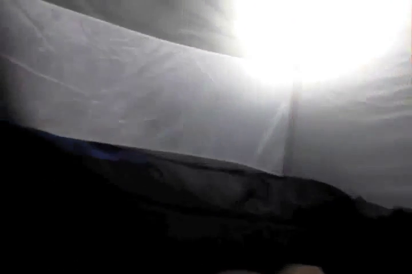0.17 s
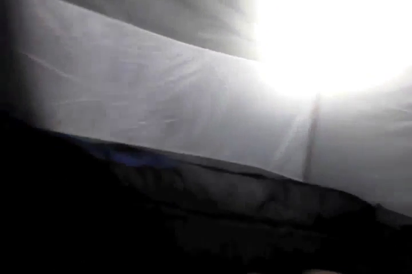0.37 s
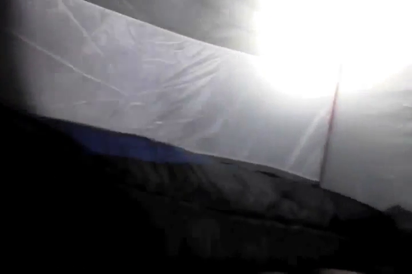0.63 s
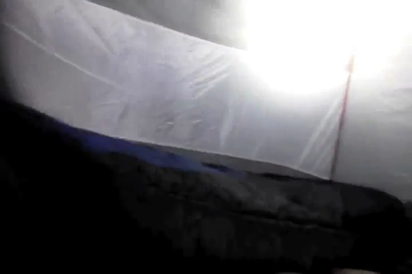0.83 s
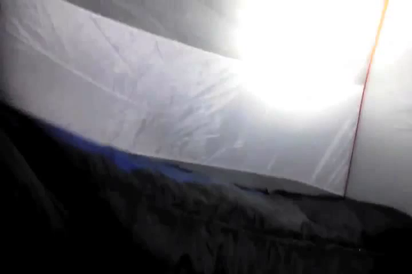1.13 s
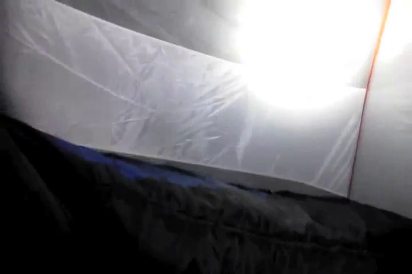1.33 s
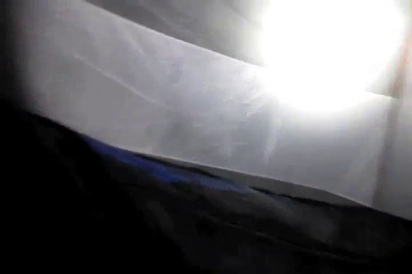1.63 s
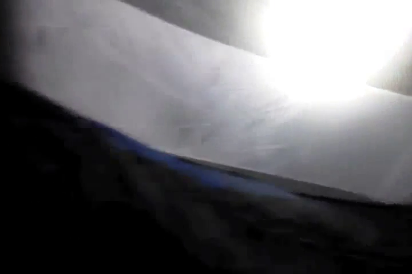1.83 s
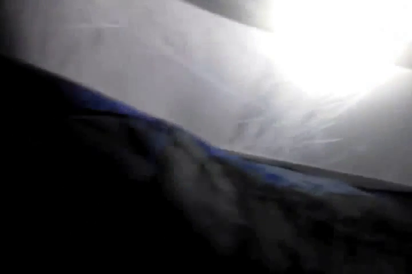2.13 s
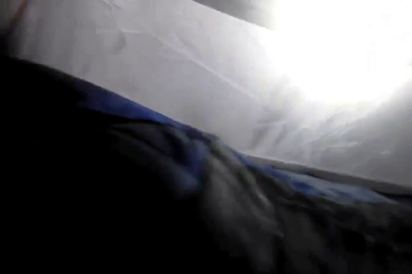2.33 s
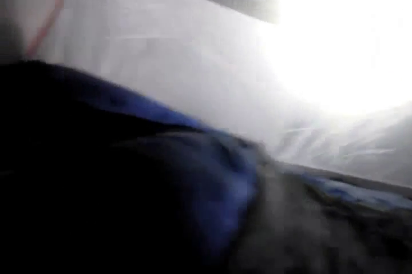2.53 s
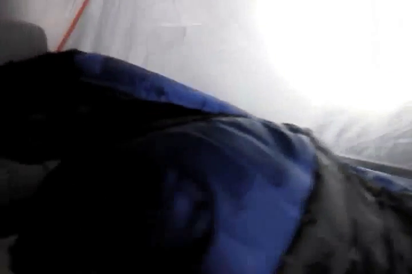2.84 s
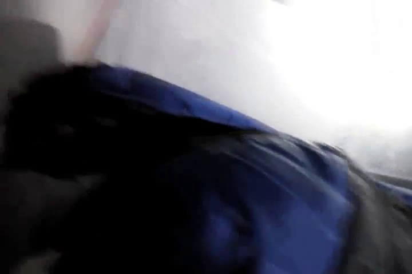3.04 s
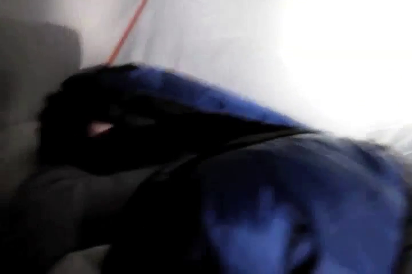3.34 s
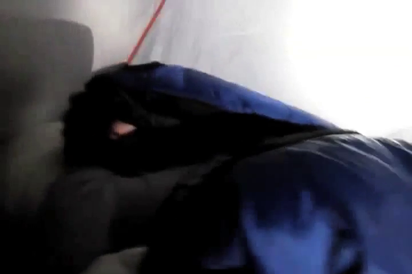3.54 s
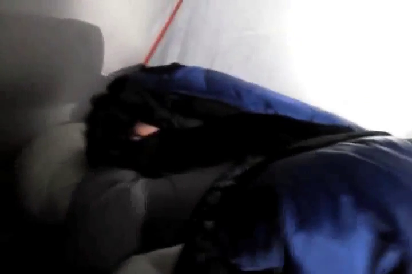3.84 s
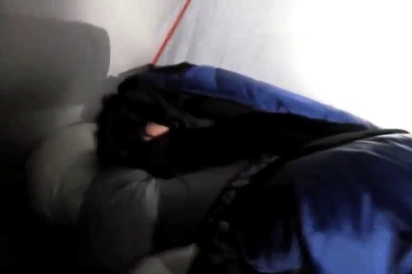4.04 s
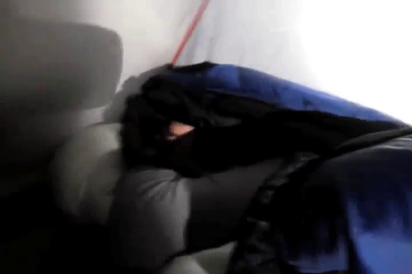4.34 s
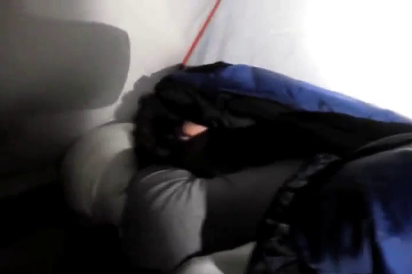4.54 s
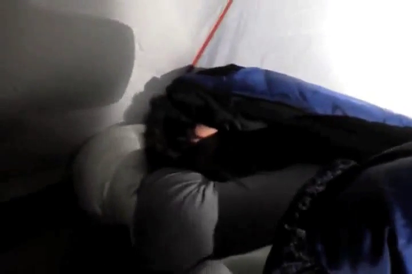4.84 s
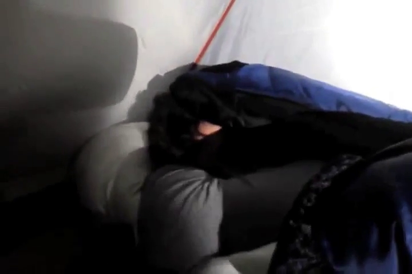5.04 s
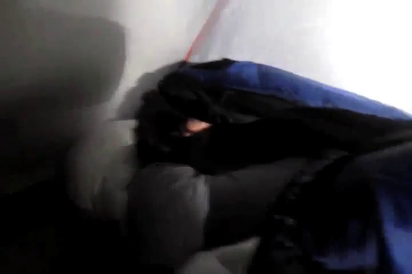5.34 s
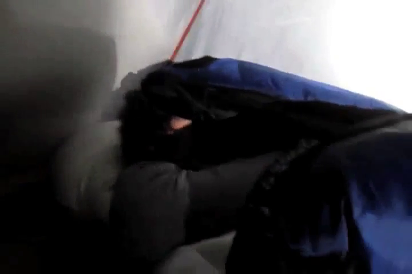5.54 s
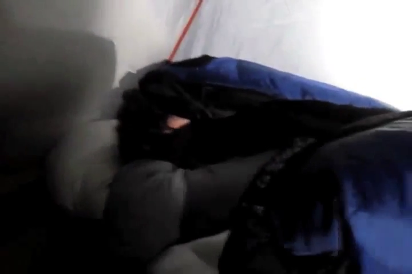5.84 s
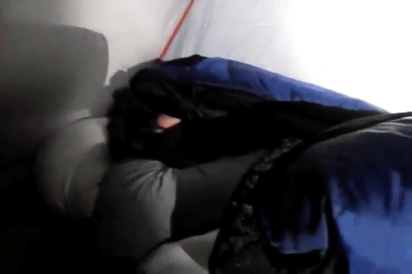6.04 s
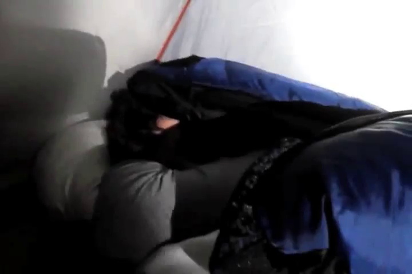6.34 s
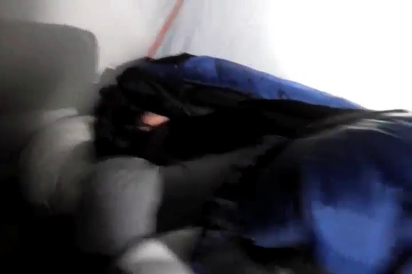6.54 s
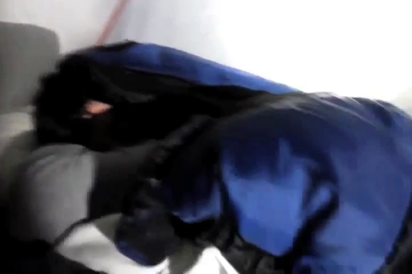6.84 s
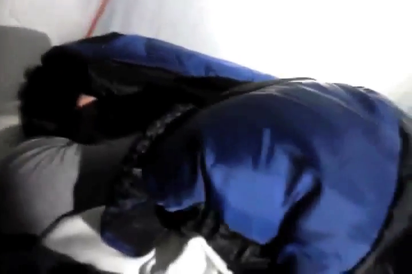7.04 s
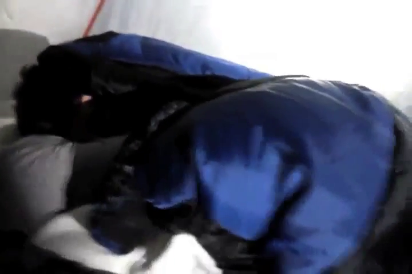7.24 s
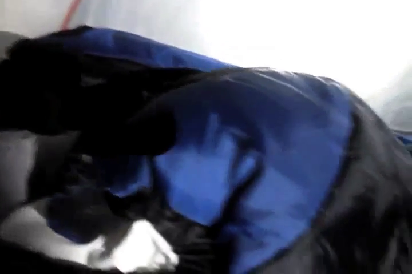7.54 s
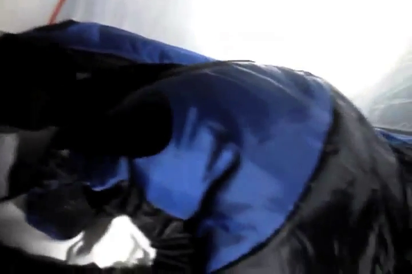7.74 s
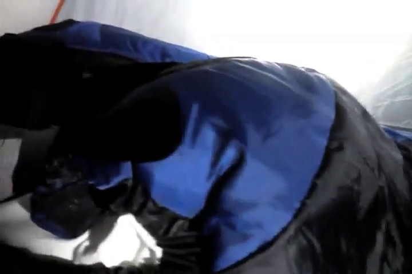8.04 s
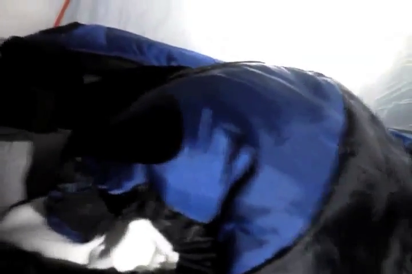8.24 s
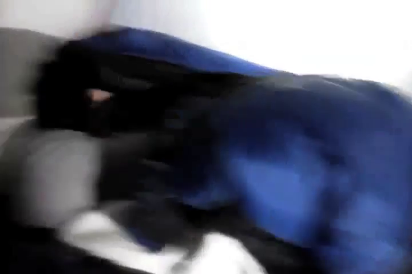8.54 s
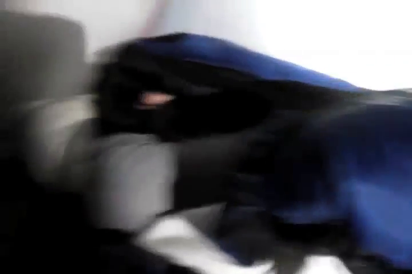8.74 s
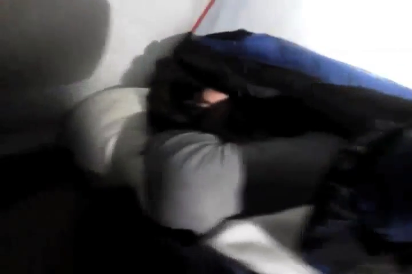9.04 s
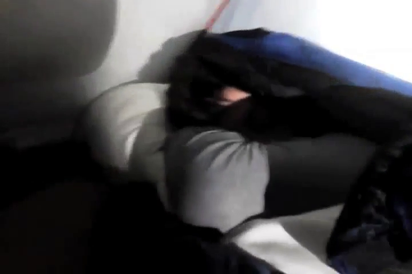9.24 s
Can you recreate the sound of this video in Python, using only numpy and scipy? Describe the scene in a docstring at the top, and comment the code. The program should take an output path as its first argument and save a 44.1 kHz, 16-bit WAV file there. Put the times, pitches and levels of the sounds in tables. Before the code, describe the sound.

Heard from inside a tent at night through a small camera with coarse, bright-edged sound. At 0 s the echoes of a call fade beneath light finger taps and a soft rub of nylon. From about 0.3 s a nightjar outside calls about every 0.9 s until the end near 9.4 s: a short scoop into a held whistle, a lower rough rising note, then a loud, rapid sweep up and down. All notes flutter and smear into woodland echoes. Close knocks gather at 0.35-0.75 s, the last a dull, strong thud. Sleeping-bag rustles come in short strokes until about 1.4 s, again near 2 s, and faintly to 3.3 s. Taps recur at 2.1 and 2.2 s, with faint ones at 5.5, 7.4 and 7.6 s. Low lumpy grip rumble peaks near 1 s and stirs slightly around 4 s. Steady soft hiss lies beneath.

```python
"""Soft taps and rustling nylon come first, over the dying echoes of a call; then a nightjar sings its three-note call
again and again among trees, heard from inside a tent. Each note is a fluttering tone with a gliding pitch, convolved
with decaying noise for the smear of echoes from the trunks. Fingertips ring the damped modes of a small camera's
case; the sleeping bag and the grip on the camera are shaped noise, over a steady hiss. The camera takes 8000 samples
a second and joins them by straight lines, which mirrors every sound into the treble."""
import sys
import numpy as np
from scipy import signal
from scipy.fft import rfft, irfft, next_fast_len
from scipy.io import wavfile
from scipy.ndimage import uniform_filter1d, map_coordinates

SR = 44100
rng = np.random.default_rng(int(sys.argv[2]) if len(sys.argv) > 2 else 0)


def waveform_to_disk(signal):
    """Save audio, clipped to [-1, 1], as 16-bit WAV at the path in sys.argv[1]."""
    frames = np.transpose(np.atleast_2d(signal))
    scaled = np.clip(frames, -1, 1) * 32767
    samples = np.round(scaled).astype(np.int16)
    wavfile.write(sys.argv[1], SR, samples)


N = 414099


def amp(db):
    """Amplitude ratio from level: 20 dB is a factor of ten."""
    return 10 ** (np.asarray(db) / 20)


def unit(x):
    """Normalise the mean power to one."""
    return x / np.sqrt(np.mean(x ** 2) + 1e-20)


def wobble(rate, size=N):
    """Slow random modulation: a smooth curve through normal random knots, rate of them a second."""
    knots = rng.standard_normal(size // 100 + 4)
    return map_coordinates(knots, [np.arange(size) * rate / SR])


def filtered(x, response):
    """Linear filtering: the spectrum of x times a response of frequency."""
    size = next_fast_len(N + 8192)
    hz = np.fft.rfftfreq(size, 1 / SR)
    return irfft(rfft(x, size) * response(hz), size)[:N]


def coloured(x, spectrum):
    """Spectral shaping through (frequency [Hz], level [dB]) points on a log axis, brought to rms 1."""
    f, db = np.transpose(spectrum)
    return unit(filtered(x, lambda hz: amp(np.interp(np.log(hz + 1), np.log(f), db, right=-120))))


def gain_curve(rows):
    """Amplitude envelope: gain per sample from (time [s], level [dB]) rows, -120 dB outside them."""
    s, db = np.transpose(rows)
    return amp(np.interp(np.arange(N) / SR, s, db, left=-120, right=-120))


def add(track, s, sound):
    """Superposition: mix sound in at s seconds; the track starts one second early."""
    part = track[round((s + 1) * SR):][:len(sound)]
    part += sound[:len(part)]


def wood_echoes():
    """Multiple scattering: decaying noise from the wood, with humps of energy from nearer stands of trunks."""
    wood_db, wood_t60_s = -44, 1.45  # the even wash from the rest of the wood
    # Nearer stands of trunks: (echo delay [s], spread [s], level [dB])
    stands = [(.01, .02, -41), (.08, .02, -42.5), (.2, .02, -52)]
    lag = np.arange(SR) / SR
    power = amp(wood_db - 60 * lag / wood_t60_s) ** 2
    for delay, spread, db in stands:
        power += amp(db) ** 2 * np.exp(-((lag - delay) / spread) ** 2)
    return np.sqrt(power) * amp(2.2 * wobble(90, SR)) * rng.standard_normal(SR)


def note(shape, flutter_hz, depth, stretch=1, direct_db=0, scatter_db=0):
    """Modulated tone: a pitch glide with a throbbing level, heard directly and scattered by the trunks.

    direct_db and scatter_db tilt the brightness of each path [dB per kHz].
    """
    fade_s, pivot_hz = .005, 2250  # fade at each end, before stretching; pitch about which brightness tilts
    s, hz, db = np.transpose(shape)
    t = s[0] + np.arange(SR // 4) / SR / stretch
    glide = uniform_filter1d(np.interp(t, s, hz), size=140)
    pitch = glide * (1 + .003 * rng.standard_normal())  # slightly different each time

    beat = np.cumsum(flutter_hz * (1 + .25 * wobble(40, len(t)))) / SR + rng.random()
    throb = .8 * np.cos(2 * np.pi * beat)  # uneven, in the syrinx
    hoarse_edge = .55 * wobble(420, len(t))
    flutter = 1 + depth * (throb + hoarse_edge)

    fade = np.clip(np.minimum(t - s[0], s[-1] - t) / fade_s, 0, 1) ** 2
    envelope = amp(np.interp(t, s, db) + 2.2 * wobble(60, len(t))) * flutter * fade
    tone = np.sqrt(2) * envelope * np.sin(2 * np.pi * np.cumsum(pitch) / SR)

    khz = (pitch - pivot_hz) / 1000
    direct = np.pad(tone * amp(direct_db * khz), (0, SR - 1))
    scattered = signal.fftconvolve(tone * amp(scatter_db * khz), wood_echoes())
    return direct + scattered


def nightjar():
    """Two-voiced syrinx: a scoop to a held note, a low rising one with a pip above, then a loud sweep up and down."""
    # Calls: (held note's mark [s], scoop [dB], held part [dB], middle note [dB], pip [dB], top of last note [s],
    # last note [dB], its stretch [1 = usual], its brightness on the direct path [dB per kHz])
    calls = [(-.57, -40, -38, -44, -48, -.12, -34, 1.01, 6),
             (.357, -36, -44, -44, -37, .802, -33.5, 1.01, 8),
             (1.285, -36, -38, -43, -56, 1.73, -33.5, 1.01, 6.5),
             (2.202, -39, -37, -44, -43, 2.635, -31.5, .93, 4),
             (3.118, -43, -38, -45.5, -43, 3.557, -32, 1.01, 0),
             (4.044, -41, -36, -45.5, -46, 4.484, -32.5, .99, -1.5),
             (4.949, -44, -35, -45.5, -52, 5.389, -32, .93, 1.5),
             (5.833, -44, -36.5, -45.5, -48, 6.265, -32, 1.02, -2.5),
             (6.727, -45, -36, -46, -57, 7.166, -33.5, 1.04, .2),
             (7.659, -47, -39, -45, -49, 8.099, -33.5, 1.04, 6),
             (8.585, -44, -38.5, -45.5, -51, 9.024, -32, .94, 1.5)]
    # Note shapes: (time from the note's mark [s], pitch [Hz], level [dB])
    scoop = [(-.07, 1380, -13), (-.045, 1450, -15), (-.035, 1520, -2), (-.02, 1600, 1)]
    held = [(-.029, 1700, -3), (-.015, 1724, -1.5), (.012, 1728, -2.5), (.029, 1700, -7)]
    middle = [(-.252, 1225, -11), (-.205, 1280, -12), (-.177, 1305, -6), (-.154, 1330, -9),
              (-.138, 1375, 0), (-.115, 1395, -2), (-.085, 1405, -5.5), (-.06, 1520, -.5)]
    pip = [(-.126, 1520, 0), (-.1, 1575, 0)]
    sweep = [(-.066, 1540, -14), (-.055, 1760, -3.5), (-.036, 2170, -3.5), (-.01, 2650, -4),
             (-.003, 2740, -3), (.005, 2740, -3.5), (.013, 2540, -4), (.024, 2180, -.5), (.036, 1970, .5),
             (.048, 1790, -4.5), (.062, 1715, -10)]
    # The second voice follows part of the upward sweep at .9 of its pitch, 1.5 dB lower
    under = np.array(sweep[2:5]) * [1, .9, 1] + [0, 0, -1.5]
    scatter_db = 5  # dB per kHz: trunks scatter the top of the sweep more

    track = np.zeros(N + SR)
    for held_s, scoop_db, held_db, middle_db, pip_db, top_s, sweep_db, stretch, bright_db in calls:
        for mark_s, db, shape in (held_s, scoop_db, scoop), (held_s, held_db, held), (top_s, pip_db, pip):
            add(track, mark_s + shape[0][0], amp(db) * note(shape, flutter_hz=160, depth=.28))
        add(track, top_s + middle[0][0], amp(middle_db) * note(middle, flutter_hz=80, depth=.38))
        for voice in sweep, under:
            sung = note(voice, flutter_hz=135, depth=.46, stretch=stretch,
                        direct_db=bright_db, scatter_db=scatter_db)
            add(track, top_s + voice[0][0] * stretch, amp(sweep_db) * sung)
    return track[SR:]


def camera_taps():
    """Modal ringing: a soft fingertip loads the case for a moment; its modes then die within a few cycles."""
    # Taps on the camera: (time [s], thud in the lowest mode [dB], knock in the upper modes [dB])
    touches = [(.01, -46, -40), (.117, -50, -42), (.152, -50, -34), (.187, -54, -45), (.348, -44, -41),
               (.4167, -42, -30), (.668, -38, -38), (.69, -27, -31), (.7307, -20, -26), (2.0597, -46, -32),
               (2.234, -39, -45), (5.473, -42, -43), (7.379, -38, -43), (7.566, -50, -51)]
    # Modes of the camera case: (frequency [Hz], time to decay by 60 dB [s])
    modes = [(130, .042), (330, .022), (490, .016), (800, .008)]
    # The upper three modes relative to a tap's knock: (level [dB])
    upper_db = [-1, -3.5, -15]
    track = np.zeros(N + SR)
    t = np.arange(-SR // 100, SR // 10) / SR
    rise = np.exp(-(np.minimum(t, 0) / .0025) ** 2)  # the load builds over a few ms
    rings = np.array([amp(-60 * np.maximum(t, 0) / t60) * np.cos(2 * np.pi * hz * t) for hz, t60 in modes])
    for s, thud_db, knock_db in touches:
        thud = amp(thud_db) * rings[0]
        knock = amp(knock_db) * amp(upper_db) @ rings[1:]
        add(track, s + t[0], -rise * (thud + knock))
    return track[SR:]


def sleeping_bag():
    """Stick-slip friction: nylon slides in dense small slips, with sharper creases in bursts."""
    # Strokes on the bag: (time [s], length [s], level [dB])
    stroke_rows = [(0, .27, -50), (.38, .05, -51), (.59, .14, -46.5), (.8, .12, -50), (.93, .1, -47),
                   (1.1, .03, -47), (1.36, .06, -49.5), (1.95, .13, -47), (2.51, .13, -54),
                   (2.87, .03, -54), (3.12, .16, -60)]
    # Spectrum of rubbed nylon: (frequency [Hz], relative level [dB])
    nylon = [(60, -30), (200, -7), (500, -6), (800, -7), (1400, -4.5), (2200, -7), (3200, -2.2), (4000, -8)]
    rise_rate, fall_rate = 250, 120  # dB per s: a stroke starts fast and slackens more slowly
    t = np.arange(N) / SR
    levels = []
    for s, hold, db in stroke_rows:
        rise = rise_rate * np.maximum(s - t, 0)
        fall = fall_rate * np.maximum(t - s - hold, 0)
        levels.append(db - rise - fall)
    levels.append(-55 - 3.5 * t)  # faint shifting between strokes, dying away
    sliding = np.linalg.norm(amp(levels), axis=0)  # powers add
    slips = rng.standard_normal(N) * amp(1.5 * wobble(120) + 2.4 * wobble(25))
    is_crease = rng.random(N) < 160 / SR * amp(6.5 * wobble(18))  # a rate that surges and ebbs
    creases = is_crease * rng.standard_normal(N) * amp(18.5)
    return sliding * coloured(slips + creases, nylon)


def camera_grip():
    """Handling noise: the grip on the camera rumbles as low noise modulated into lumps."""
    # Level of the rumble: (time [s], level [dB])
    rumble = [(0, -54), (.5, -55), (.85, -55), (1.05, -48), (1.3, -59), (1.75, -65), (2.15, -56),
              (2.46, -65), (3.5, -65), (3.7, -60), (4.3, -60), (4.5, -66), (6, -65.5), (9.39, -67.5)]
    # Spectrum of the rumble: (frequency [Hz], relative level [dB])
    grip_spectrum = [(25, -40), (60, -13), (105, 0), (150, -3), (260, -14), (600, -30)]
    swell = amp(3.5 * wobble(30) + 1.2 * wobble(5))
    lumps = unit(swell * coloured(rng.standard_normal(N), grip_spectrum))
    return gain_curve(rumble) * lumps


def night_hiss():
    """Broadband noise: the nearly steady hiss of air and microphone."""
    # Spectrum of the hiss: (frequency [Hz], relative level [dB])
    hiss_spectrum = [(20, -14), (45, -9), (90, -6), (130, -5), (220, -5), (450, -6), (800, -9), (1500, -9),
                     (2500, -13), (3300, -15.5), (4000, -19)]
    return amp(-57 + .7 * wobble(4)) * coloured(rng.standard_normal(N), hiss_spectrum)


def scene():
    """Superposition of the bird, the handling sounds and the night."""
    return (nightjar() + camera_taps() + sleeping_bag() + camera_grip() + night_hiss())[None]


def record(dry):
    """Imaging: a bass cut, coarse sampling, straight lines that leave mirror images, then a band limit."""
    camera_rate, top_hz = 8000, 15650  # samples per s; Hz
    t = np.arange(N) / SR
    ticks = np.arange(0, N / SR, 1 / camera_rate)
    bass_cut = signal.butter(2, 70., "high", fs=SR, output="sos")
    heard = signal.sosfilt(bass_cut, dry[0])
    # Fourfold oversampling lets the signal be read between its samples
    smooth = signal.resample(filtered(heard, lambda hz: hz < camera_rate / 2), 4 * N)
    samples = np.interp(ticks, np.arange(4 * N) / (4 * SR), smooth)
    joined = np.interp(t, ticks, samples)
    return filtered(joined, lambda hz: hz < top_hz)[None]


dry = scene()
out = record(dry)
waveform_to_disk(out)
```